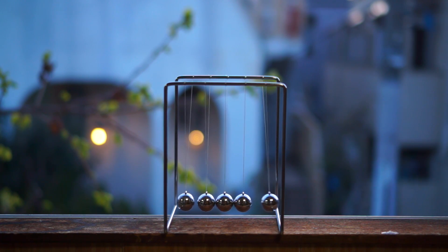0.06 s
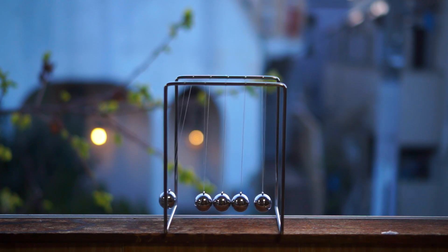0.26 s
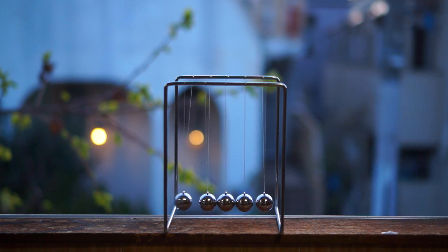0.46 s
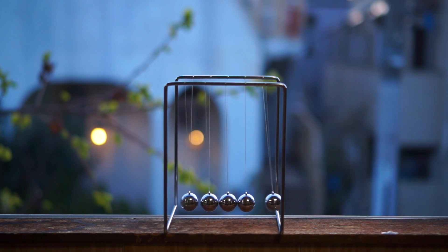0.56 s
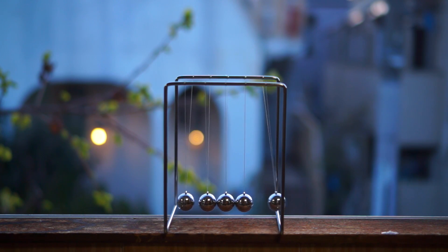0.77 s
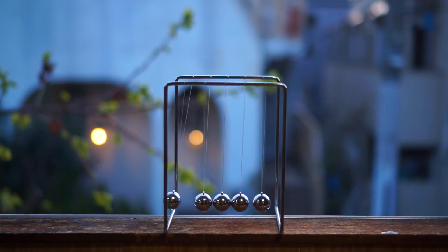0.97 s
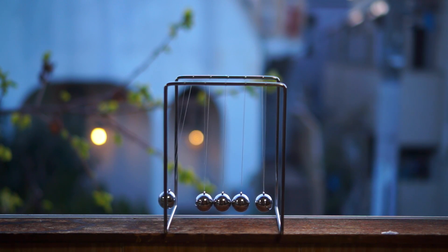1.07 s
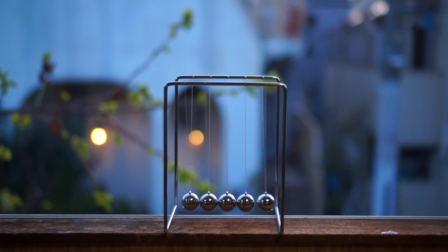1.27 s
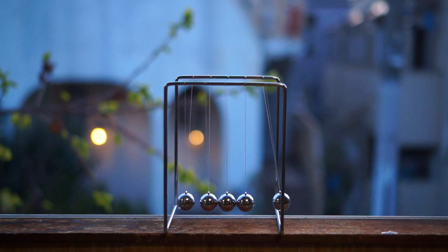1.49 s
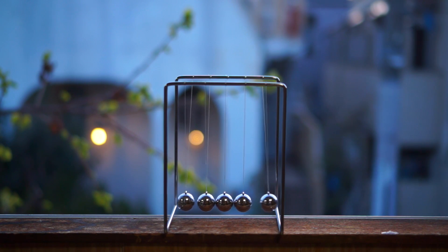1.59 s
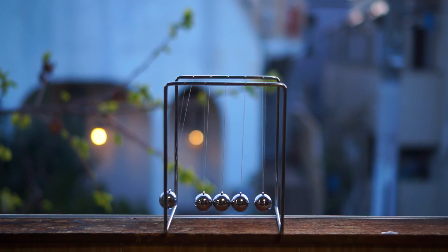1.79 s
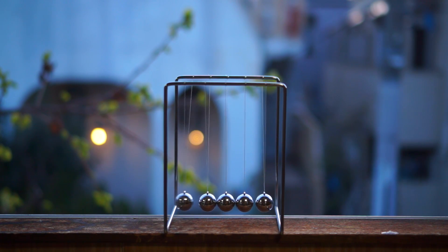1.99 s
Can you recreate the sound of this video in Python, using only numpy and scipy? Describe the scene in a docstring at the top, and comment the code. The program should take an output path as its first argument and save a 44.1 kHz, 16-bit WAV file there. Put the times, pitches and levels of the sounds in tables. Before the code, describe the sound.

The steel balls of a desktop cradle strike each other in five sharp, evenly spaced clicks close by, each with a brief bright echo off nearby walls. Distant traffic rumbles steadily, and a faint far clack precedes the last click.

```python
"""Steel ball cradle at dusk

A cradle of hanging steel balls clicks five times outdoors, over the steady rumble of a town.
Each click is a small tick, then four contacts running through the row within 5 ms.
A bright wash from nearby walls follows, with a faint ring of the frame.
One far clack sounds between the last two clicks."""
import sys
import numpy as np
from scipy import signal
from scipy.fft import rfft, irfft
from scipy.io import wavfile
from scipy.ndimage import uniform_filter1d

SR = 44100
rng = np.random.default_rng(int(sys.argv[2]) if len(sys.argv) > 2 else 0)


def persist_wave(psi):
    """Save psi, clipped to +-1, as 16-bit WAV."""
    counts = np.round(np.clip(psi, -1, 1) * 32767).astype(np.int16)
    wavfile.write(sys.argv[1], SR, np.atleast_2d(counts).T)


N = 90404


def undb(db):
    """Decibels to gain."""
    return 10 ** (np.asarray(db) / 20)


def unit(x):
    """Scale to an average energy of one per channel."""
    return x / np.sqrt(np.mean(np.sum(x ** 2, axis=-1)) + 1e-18)


def pan(db):
    """Stereo gains that put the left db above the right."""
    return undb(np.array([[db], [-db]]) / 2)


def stereo(mid, side, width):
    """Mid and side to left and right: width 0 is mono, 1 is fully wide."""
    return (mid + width * side * np.array([[1], [-1]])) / np.sqrt(1 + width ** 2)


def noise(width, size=N):
    """White noise of a given stereo width."""
    return stereo(*rng.standard_normal((2, size)), width)


def equalise(x, curve, size=8192):
    """Minimum-phase EQ through (Hz, dB) points, so nothing rings ahead of an attack."""
    hz, db = np.array(curve, float).T
    grid = np.maximum(np.arange(size // 2 + 1) * SR / size, 1)
    gain = undb(np.interp(np.log(grid), np.log(hz), db))
    cepstrum = irfft(np.log(gain))
    cepstrum[1:size // 2] *= 2
    cepstrum[size // 2 + 1:] = 0
    impulse = irfft(np.exp(rfft(cepstrum)))
    return signal.fftconvolve(x, impulse[None], axes=1)[:, :x.shape[1]]


def decay(t, t60):
    """Exponential fall of 60 dB in t60 seconds."""
    return np.exp(-np.log(1000) * t / t60)


def add(out, x, start):
    """Mix a sound in at a time in seconds."""
    i = int(start * SR)
    out[:, i:i + x.shape[1]] += x[:, :max(N - i, 0)]


def ground_reflections(x, depth_db=1.35, spacing_hz=110):
    """Reflections off the ground put shallow random peaks and dips in the lower spectrum."""
    f = np.arange(N // 2 + 1) * SR / N
    ripple = np.interp(f / spacing_hz, np.arange(32), rng.standard_normal(32), right=0)
    return irfft(rfft(x) * undb(depth_db * ripple), N)


# The town's rumble and hiss. Each row: frequency in Hz, relative level in dB.
TOWN_EQ = [(25, -30), (60, -25.5), (90, -17), (125, -17.5), (180, -5), (260, 0), (360, -2.5), (520, -1.5),
           (900, 1), (1500, -3), (2200, -10.5), (3500, -11.5), (4400, -9), (5200, -16.5), (7300, -17.5),
           (9500, -21), (15500, -25.5)]

def traffic(level_db=-53.5, fade_db_per_s=0.5, swell_db=0.65, crossover_hz=9000):
    """A bed of distant traffic that swells slightly; its hiss is wider than its rumble."""
    t, f = np.arange(N) / SR, np.arange(N // 2 + 1) * SR / N
    hiss_share = f ** 2 / (f ** 2 + crossover_hz ** 2)
    rumble = rfft(noise(width=0.48)) * np.sqrt(1 - hiss_share)
    hiss = rfft(noise(width=0.89)) * np.sqrt(hiss_share)
    slow_spectrum = rfft(rng.standard_normal(N)) * np.exp(-f / 4)
    swell = unit(irfft(slow_spectrum, N)) * np.sqrt(N)
    bed = unit(equalise(ground_reflections(irfft(rumble + hiss, N)), TOWN_EQ)) * np.sqrt(N)
    return bed * undb(level_db - fade_db_per_s * t + swell_db * swell)


# Far engines and, last, a thin hiss. Each row: centre in Hz, bandwidth in Hz, level in dB,
# loudest moment in seconds, spread either side of it in seconds.
DRONE_BANDS = [(89.2, 8, -84.5, 0.97, .6), (186, 21.4, -76, .6, 1.0), (266.5, 32, -65.5, 0.14, .35),
               (266, 32, -74, 1.4, .4), (4320, 280, -75, 1.0, 3)]

def drones():
    """Far engines and a thin hiss: narrow bands of noise that rise and fall away."""
    t, f = np.arange(N) / SR, np.arange(N // 2 + 1) * SR / N
    out = np.zeros((2, N))
    for hz, bandwidth, db, peak_s, spread_s in DRONE_BANDS:
        band = np.exp(-2 * ((f - hz) / bandwidth) ** 2)
        drone = unit(irfft(rfft(noise(width=0.48)) * band, N)) * np.sqrt(N)
        out += undb(db) * drone * np.exp(-0.5 * ((t - peak_s) / spread_s) ** 2)
    return out


# The thin, bright tick. Each row: frequency in Hz, relative level in dB.
TICK_EQ = [(60, -50), (400, -28), (2500, -10), (4500, -7), (7500, 4.5), (10500, -5), (13000, -13),
           (16000, -34)]

def tick(size=512):
    """The ball's first touch: a sharp impulse and a millisecond of rattle."""
    rattle = unit(noise(width=0.3, size=size) * decay(np.arange(size) / SR, t60=0.0037))
    return unit(equalise(undb(-7) * rattle - signal.unit_impulse(size), TICK_EQ))


# The tone of steel on steel. Each row: frequency in Hz, relative level in dB.
STEEL_EQ = [(60, -60), (400, -32), (1800, -30), (2700, -23), (3300, -19), (3800, -8.5), (4400, -1.5),
            (5400, 1.5), (6100, -0.5), (7000, 4), (7900, -1.5), (8900, -9.5), (10000, -8), (11600, -13),
            (13200, -29), (16000, -50)]

def contact(tilt_db, length_s=0.00065, smooth_hz=1500, wide_hz=10900, size=1024):
    """One ball knocks the next: a tiny noise burst, fully wide in the top treble."""
    t, f = np.arange(size) / SR, np.arange(size // 2 + 1) * SR / size
    window = np.sin(np.pi * np.minimum(t / length_s, 1)) ** 0.25
    bursts = rfft(rng.standard_normal((2, size)) * window)
    # Flatten each burst so that all knocks share the same broad tone.
    power = uniform_filter1d(abs(bursts) ** 2, int(smooth_hz * size / SR), axis=1)
    mid, side = bursts / np.sqrt(power)
    spectrum = stereo(mid, side, width=0.2 + np.minimum(f / wide_hz, 1) ** 4)
    knock = irfft(spectrum * undb(tilt_db * np.log2(f + 1)))
    knock[:, size // 2:] = 0
    return unit(equalise(knock, STEEL_EQ))


# The knocks along the row. Each row: delay after the tick in ms, relative level in dB.
ROW_CONTACTS = [(1.3, -0.2), (2.2, 0.5), (3.15, 0.7), (3.8, -0.5)]

def click(out, start, db, pan_db, tilt_db, jitter_ms=0.08):
    """A ball lands with a tick, and the blow runs through the row in four contacts."""
    add(out, undb(-17) * tick(), start)
    for delay_ms, contact_db in ROW_CONTACTS:
        lag_s = (delay_ms + jitter_ms * rng.standard_normal()) / 1000
        add(out, undb(db + contact_db - 6.8) * pan(pan_db) * contact(tilt_db), start + lag_s)


def reflections(paths, curve, t60, rise_s):
    """Noise shaped into dense reflections that build and die away, sooner above 9 kHz."""
    t = np.arange(paths.shape[1]) / SR
    low = signal.sosfiltfilt(signal.butter(2, 9000, fs=SR, output="sos"), paths)
    tail = low * decay(t, t60) + (paths - low) * decay(t, t60 / 1.38)
    return unit(equalise(tail * np.minimum(t / rise_s, 1), curve))


def early_reflections():
    """Surfaces close by throw back a short, steely splash."""
    return reflections(noise(width=0.52, size=SR // 4), STEEL_EQ, t60=0.022, rise_s=0.0012)


# The bright return from the walls. Each row: frequency in Hz, relative level in dB.
WALL_EQ = [(60, -62), (400, -39), (1700, -23), (2500, -13.5), (3200, -15), (4200, -5), (5400, -1.5),
           (6600, 1), (7900, 0), (8800, -3.5), (10500, -5.5), (12000, -13.5), (13500, -21), (16000, -38)]
WALL_WIDTH = 0.73

def wall_wash(repeating_paths):
    """The walls' tail: some reflections repeat on every click, others are new each time."""
    paths = repeating_paths + 0.76 * noise(WALL_WIDTH, size=SR)
    return pan(1.5) * reflections(paths, WALL_EQ, t60=0.32, rise_s=0.0032)


# The frame's modes. Each row: frequency in Hz, relative level in dB.
FRAME_MODES = [(4506, -7), (5160, 9), (5524, -3), (6011, -3), (6473, -3), (6621, -7), (6877, 7), (7340, 3),
               (7808, -7), (8343, 2), (8626, -6), (8761, -3), (9147, 6), (10663, -1)]

def frame_ring():
    """The frame rings in decaying sine modes, with a different phase at each ear."""
    t = np.arange(SR) / SR
    modes = sum(undb(db) * np.sin(2 * np.pi * (hz * t + rng.random((2, 1)))) for hz, db in FRAME_MODES)
    return modes * decay(t, t60=0.34)


def wall_echo():
    """A short slap back from the walls."""
    return reflections(noise(WALL_WIDTH, size=SR // 4), WALL_EQ, t60=0.03, rise_s=0.0024)


# The swings landing. Each row: start in seconds, then the contacts' relative level in dB,
# pan to the left in dB and brightness in dB per octave.
LANDINGS = [(0.2091, 0, 1.8, 0), (.5914, -0.3, 3, -1), (.9741, -.3, 2.5, 0.5), (1.3567, -0.1, 3, -.5),
            (1.7389, 0, 3.5, 1)]

def cradle():
    """Each landing clicks, sets the frame ringing and comes back off the surroundings."""
    out = np.zeros((2, N))
    repeating_paths = noise(WALL_WIDTH, size=SR)
    for start, db, pan_db, tilt_db in LANDINGS:
        click(out, start, db, pan_db, tilt_db)
        add(out, undb(-14) * early_reflections(), start + 0.005)
        add(out, undb(-5.9) * wall_wash(repeating_paths), start + 0.005)
        add(out, undb(-57) * frame_ring(), start + 0.005)
        add(out, undb(-19) * wall_echo(), start + 0.022)
    return out


# The duller tone of the far clack. Each row: frequency in Hz, relative level in dB.
FAR_CLACK_EQ = [(300, -24), (1800, -25), (2600, -3), (3400, -3), (4200, 1.5), (5500, -2), (7500, -2),
                (9000, -12), (10500, -10), (13000, -23), (16000, -42)]

def far_clack():
    """A faint clack from further off, heard as a tail of reflections."""
    out = np.zeros((2, N))
    clack = reflections(noise(WALL_WIDTH, size=SR), FAR_CLACK_EQ, t60=0.59, rise_s=0.006)
    add(out, undb(-17.5) * clack, start=1.499)
    return out


def scene():
    """The cradle in front; the far clack behind, and the town a touch to the left."""
    return cradle() + far_clack() + pan(0.95) * (traffic() + drones())


def record(dry):
    """A steep high cut at 15.8 kHz."""
    return signal.sosfilt(signal.ellip(8, 0.2, 70, 15800, fs=SR, output="sos"), dry)


dry = scene()
out = record(dry)
persist_wave(out)
```